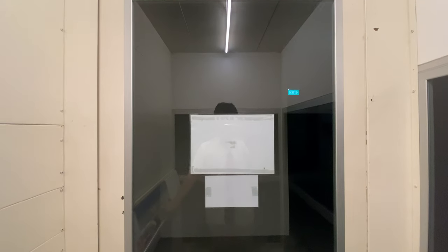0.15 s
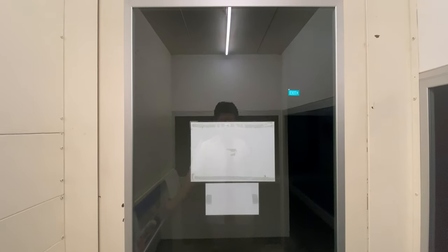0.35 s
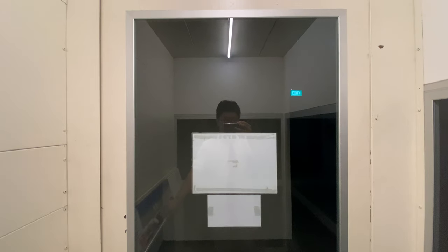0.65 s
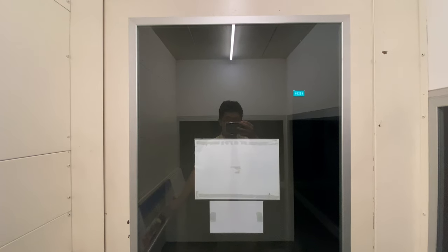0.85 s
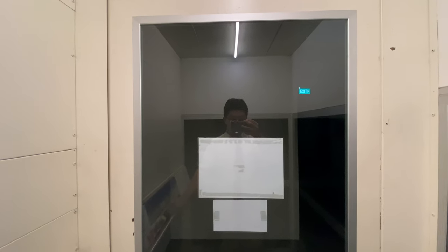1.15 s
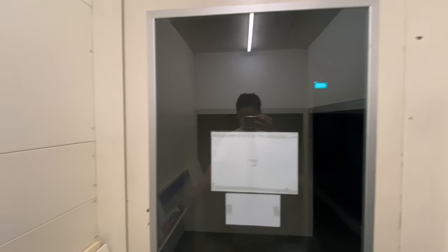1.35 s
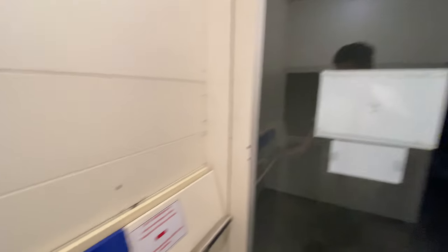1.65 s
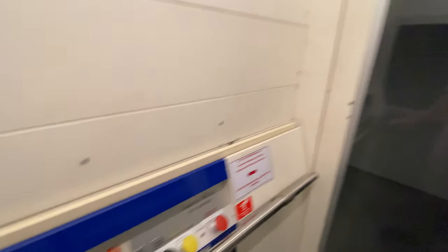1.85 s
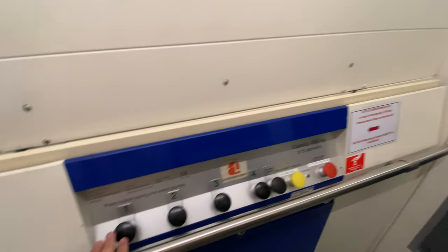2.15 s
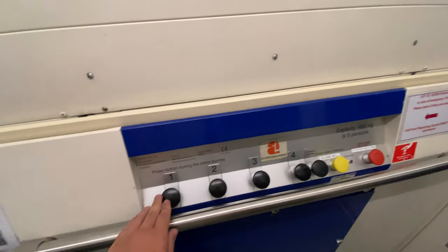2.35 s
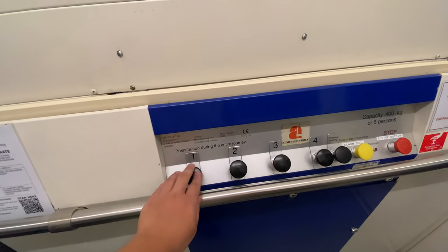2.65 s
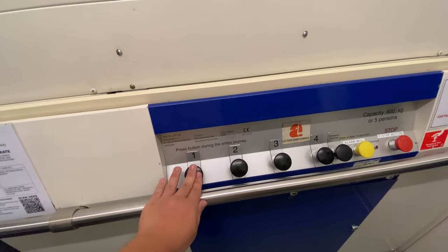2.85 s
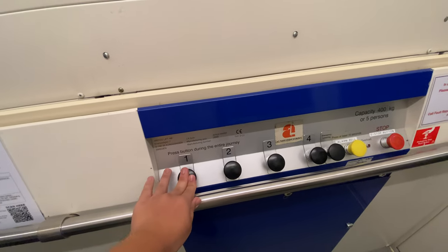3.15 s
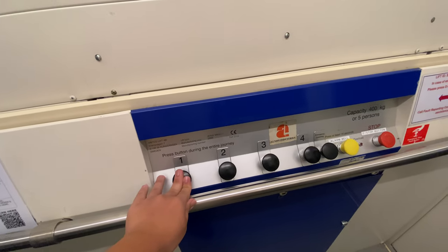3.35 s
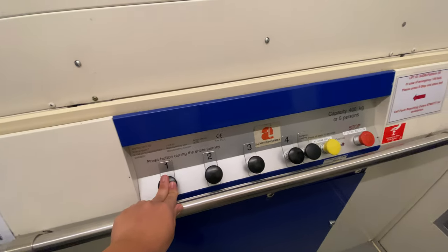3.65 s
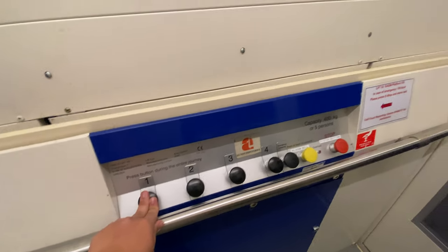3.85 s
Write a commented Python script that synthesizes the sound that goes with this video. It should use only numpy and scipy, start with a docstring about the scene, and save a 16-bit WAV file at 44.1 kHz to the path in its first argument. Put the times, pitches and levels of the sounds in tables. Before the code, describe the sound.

A small platform lift's geared motor whirrs steadily, slows and stops with a metallic clack; someone scuffs and bumps on the platform, mechanism knocks rapidly, then the drive groans back up, heard close inside a reverberant panelled shaft.

```python
"""A geared drive whirrs, clacks and fades as it slows, then hums, groans and whirrs back up: a small platform lift.
In between, the platform thumps and scuffs, a relay or brake part rings briefly and the mechanism knocks.
The drive is gear tones, repeating mesh noise and random grinding that follow one speed curve.
Knocks are rattling noise bursts, struck parts are decaying modes, scuffs and drone are shaped noise.
Drive, knocks and scuffs reverberate in the narrow panelled shaft, over a low drone and still air."""
import sys
import numpy as np
from scipy import signal
from scipy.fft import rfft, irfft, next_fast_len
from scipy.io import wavfile
from scipy.ndimage import uniform_filter1d, map_coordinates

SR = 44100
rng = np.random.default_rng(int(sys.argv[2]) if len(sys.argv) > 2 else 0)


def unload_audio(sound):
    """Save the sound as a 16-bit wav file, at the path given as the first command line argument."""
    columns = np.transpose(np.atleast_2d(sound))
    # keep every value between -1 and 1, then stretch to whole-number steps
    steps = np.round(np.clip(columns, -1, 1) * 32767)
    wavfile.write(sys.argv[1], SR, steps.astype(np.int16))


N = 176400
T = np.arange(N) / SR
TOP_HZ = 15500  # band limit of the microphone

# likeness of left and right: (frequency [Hz], correlation [-1 to 1])
LIKENESS = [(40, 1), (70, 0.99), (125, 0.37), (250, 0.76), (500, 0.31), (1000, 0.12), (2000, -0.21),
            (4000, 0.2), (12000, .12)]


def amp(db):
    """Decibels to gain."""
    return np.exp(np.asarray(db) * (np.log(10) / 20))


def unit(x):
    """Scale to rms 1."""
    return x / np.sqrt(np.mean(x ** 2) + 1e-20)


def along(points, hz):
    """Interpolate (frequency [Hz], value) points on a log frequency axis."""
    f, v = np.transpose(points)
    return np.interp(np.log(hz + 1), np.log(f + 1), v)


def curves(rows):
    """One value per sample for each column after the time."""
    s, *cols = np.transpose(rows)
    return [np.interp(T, s, c) for c in cols]


def wobble(rate):
    """A smooth random curve through rate knots a second."""
    knots = rng.standard_normal(400)
    coarse = T[::100]
    return np.interp(T, coarse, map_coordinates(knots, [coarse * rate], mode="mirror"))


def filtered(x, response):
    """Filter x by a response given as a function of frequency."""
    n = x.shape[-1]
    m = next_fast_len(n + SR // 4, True)
    return irfft(rfft(x, m) * response(np.fft.rfftfreq(m, 1 / SR)), m)[..., :n]


def causal(points, size=2048):
    """Minimum-phase impulse response of a (frequency [Hz], level [dB]) colour, by folding its cepstrum."""
    cepstrum = irfft(np.log(amp(along(points, np.fft.rfftfreq(size, 1 / SR)))))
    cepstrum[1:size // 2] *= 2
    cepstrum[size // 2 + 1:] = 0
    return irfft(np.exp(rfft(cepstrum)))


def boosts(peaks, hz):
    """Summed gain in dB of resonances given as (centre [Hz], width [Hz], boost [dB])."""
    return sum(db / (1 + ((hz - centre) / width) ** 2) for centre, width, db in peaks)


def likeness_angle(hz):
    """Phase angle between left and right that gives their likeness at a frequency."""
    return np.arccos(np.clip(along(LIKENESS, hz), -1, 1))


def side_phases(hz):
    """Opposite phase shifts for left and right, leading on a random side."""
    return likeness_angle(hz) * rng.choice([-1, 1]) * np.array([[.5], [-.5]])


def spread(pair):
    """Mix two unrelated signals as mid and side, so left and right are as alike as the table says."""
    turn = lambda hz: likeness_angle(hz) / 2
    mid, side = filtered(pair, lambda hz: np.array([np.cos(turn(hz)), np.sin(turn(hz))]))
    return np.array([mid + side, mid - side])


def panned(db):
    """Left and right gains for a level difference; positive favours the left."""
    return amp(np.array([[db], [-db]]) / 2)


def rush(colour):
    """Coloured stereo noise of rms 1."""
    noise = rng.standard_normal((2, N))
    return unit(spread(filtered(noise, lambda hz: amp(along(colour, hz)))))


def resonant_noise(modes):
    """Stereo noise through resonances given as (centre [Hz], width [Hz], level [dB])."""
    peaks = lambda hz: sum(amp(db) / (1 + ((hz - centre) / width) ** 4) for centre, width, db in modes)
    return spread(filtered(rng.standard_normal((2, N)), peaks))


def shaft(pair, wet):
    """Add the shaft's reverberation, noise that decays at its own pace in each band, at about equal power."""
    # (frequency [Hz], time to fall 60 dB [s])
    decay_times = [(120, 0.5), (330, 0.91), (700, 0.95), (1500, 0.66), (4000, .62), (7000, 0.58),
                   (14000, 0.2)]
    hz, t, z = signal.stft(rng.standard_normal((2, SR)), SR, nperseg=256)
    decay = amp(-60 * t / along(decay_times, hz)[:, None])
    tail = signal.istft(z * decay, SR, nperseg=256)[1]
    tail /= np.sqrt(np.mean(np.sum(tail ** 2, axis=1)))
    reverb = signal.fftconvolve(pair, tail, axes=1)[:, :pair.shape[1]]
    return (pair + wet * reverb) / np.sqrt(1 + wet ** 2)


def add(out, s, sound):
    """Mix a sound in at a time in seconds."""
    part = out[:, round(s * SR):][:, :sound.shape[1]]
    part += sound[:, :part.shape[1]]


def ringing(modes, blows, attack, blur):
    """Struck modes decay as unsteady sines, shifted in phase between the sides; attack in s, blur in rad."""
    out, t = np.zeros((2, N)), np.arange(SR) / SR
    beat_db = 5.5
    for s, db in blows:
        for hz, mode_db, t60 in modes:
            phase = 2 * np.pi * hz * t + side_phases(hz) + blur * wobble(65)[:SR]
            level_db = db + mode_db - 60 * t / t60 + beat_db * wobble(46)[:SR]
            add(out, s, amp(level_db) * (1 - np.exp(-t / attack)) * np.sin(phase))
    return out


def still_air():
    """Faint steady noise, strongest in the bass."""
    # (frequency [Hz], relative level [dB])
    air_colour = [(20, 1.5), (60, 0.5), (110, 0.5), (250, -5.5), (480, -10), (700, -17.5), (1200, -25.5),
                  (2200, -30), (6500, -40), (9000, -47.5), (15000, -67)]
    return amp(-53) * rush(air_colour)


def drone():
    """Noise in the shaft's low resonances, evened out and then swelling along a level curve."""
    # (time [s], level before the trim [dB])
    swells = [(0, -39), (.85, -36), (.95, -44), (1.15, -43), (1.33, -38), (1.52, -44.5), (1.7, -36),
              (2.0, -42), (2.2, -42), (2.65, -47), (3.0, -41.5), (3.15, -48.5), (3.45, -39.5), (3.75, -38),
              (4, -39)]
    # (centre [Hz], width [Hz], relative level [dB])
    low_modes = [(47.5, 15.7, 1), (70.4, 14.4, 1), (155, 9.5, -11)]
    trim_db = 0.5
    level_db, = curves(swells)
    rumble = resonant_noise(low_modes)
    power = uniform_filter1d(np.mean(rumble ** 2, axis=0), size=8000)
    return amp(level_db + trim_db) * rumble / np.sqrt(np.abs(power) + 1e-12)


def wall():
    """A bump sets the modes of a wall sheet ringing."""
    # (frequency [Hz], relative level [dB], time to fall 60 dB [s])
    sheet_modes = [(300, -6, 0.98), (912, -0.5, 0.54), (1262, -3, .5), (1340, -2, 0.46)]
    # (time [s], level [dB])
    bumps = [(1.397, -38)]
    return ringing(sheet_modes, bumps, attack=0.011, blur=0.65)


def floor():
    """Jolts thump the low modes of the platform floor."""
    # (frequency [Hz], relative level [dB], time to fall 60 dB [s])
    floor_modes = [(84, 0, 0.11), (114.2, 2, 0.28), (146.3, 0, 0.23), (186.5, -8, 0.21)]
    # (time [s], level [dB])
    jolts = [(1.716, -38.5), (3.212, -20), (3.258, -26), (3.403, -45)]
    return panned(2.5) * ringing(floor_modes, jolts, attack=0.014, blur=0.44)


def deck():
    """Steps strike the modes of the platform deck."""
    # (frequency [Hz], relative level [dB], time to fall 60 dB [s])
    deck_modes = [(236.5, -2, 0.21), (410, -0.5, 0.27), (1766, -15, .31)]
    # (time [s], level [dB])
    steps = [(1.72, -29.5), (1.762, -33)]
    return ringing(deck_modes, steps, attack=0.0058, blur=0.5)


def scuff():
    """Uneven rubbing noise as someone turns on the platform."""
    # (time [s], level [dB])
    strokes = [(1.45, -72), (1.56, -48.5), (1.68, -36), (1.8, -37), (1.93, -35), (2.03, -50.5), (2.13, -95),
               (2.3, -52.5), (2.45, -100)]
    # (frequency [Hz], relative level [dB])
    rub_colour = [(70, -1.5), (170, -1.5), (500, -7), (1000, -2), (1400, -13), (2100, -10.5), (3500, -22.5),
                  (7000, -30), (11000, -36.5), (14000, -39)]
    level_db, = curves(strokes)
    return shaft(rush(rub_colour) * amp(level_db + 3.05 * wobble(45.2)), wet=0.86)


def relay():
    """A relay or brake part knocks and rings briefly near 550 Hz, with a few weaker modes."""
    # (frequency [Hz], relative level [dB], time to fall 60 dB [s])
    relay_modes = [(552, -0.5, 0.36), (471, -4, 0.25), (1185, -17, 0.18), (1483, -15, .2)]
    # (time [s], level [dB])
    knock = [(3.093, -28)]
    return panned(6.4) * ringing(relay_modes, knock, attack=0.0053, blur=0.35)


def knocks():
    """Each knock is a quick rattle of contacts that sets the wall panels and the shaft ringing."""
    # (time [s], rise [s], rattle's time to fall 60 dB [s], then relative level in each of five bands [dB])
    hits = [(.906, 0.0088, 0.22, -47, -36.5, -32.5, -32.5, -37.5),
            (1.333, 0.011, 0.62, -67, -49, -53.5, -54.5, -55),
            (1.392, 0.0079, 0.19, -55, -38, -35.5, -44, -52),
            (1.568, 0.0073, 0.73, -39, -64, -37.5, -47.5, -49),
            (1.708, 0.015, 0.3, -37, -36.5, -31, -38.5, -39),
            (1.88, 0.033, 0.33, -41, -64, -49, -48.5, -49.5),
            (2.965, 0.008, 0.48, -58, -48.5, -48.5, -50, -56.5),
            (3.02, 0.024, 0.65, -46, -39, -60, -50, -55), (3.088, 0.0049, 0.58, -43, -40.5, -37, -54, -59),
            (3.14, 0.026, 0.93, -59, -63, -35.5, -44, -50.5),
            (3.196, 0.018, 0.19, -48, -33, -26.5, -37.5, -39),
            (3.29, .006, 0.27, -33, -38.5, -36, -52, -61.5), (3.359, 0.02, 0.17, -61, -60, -38, -43, -43.5),
            (3.382, 0.019, .21, -31, -34, -29, -33, -40),
            (3.416, 0.0046, .092, -27, -31, -34.5, -37, -39.5), (3.457, .008, 0.2, -56, -41, -32, -39, -39),
            (3.481, 0.0062, 0.15, -38, -33.5, -24, -36.5, -36)]
    # (centre of each band [Hz])
    band_hz = [140, 450, 1400, 3500, 7000]
    # wall panel resonances: (centre [Hz], width [Hz], boost [dB])
    wall_peaks = [(925, 15, 1.8), (1247, 21, 4.9), (1576, 30, 5.7), (1900, 42, 3.4), (2280, 130, 5.3),
                  (2866, 60, 4), (4130, 12, 3.6), (5600, 42, 4.4), (5960, 216, 6.7), (6560, 68, 3.8),
                  (8000, 360, 2.3)]
    grit_depth, treble_hz, treble_loss_db = 0.28, 12400, 12
    out, t = np.zeros((2, N)), np.arange(SR // 2) / SR
    for s, rise, decay, *band_db in hits:
        # a random strength for every 30 samples makes the rattle gritty
        grit = np.exp(grit_depth * np.repeat(rng.standard_normal(len(t) // 30), 30))
        envelope = np.minimum(t / max(rise, 1e-4), 1) * amp(-60 * np.maximum(t - rise, 0) / decay)
        contacts = unit(rng.standard_normal((2, len(t))) * grit * envelope) * np.sqrt(.08)
        # scale each band against the full bandwidth, then slope off at both ends
        bands = [(hz, db + 10 * np.log10(SR / 2 / hz)) for hz, db in zip(band_hz, band_db)]
        bass = (40, bands[0][1] - 15)
        treble_db = bands[-1][1] - treble_loss_db
        colour = [bass] + bands + [(treble_hz, treble_db), (TOP_HZ, treble_db - 4)]
        add(out, s, signal.fftconvolve(contacts, causal(colour)[None], axes=1))
    panelled = filtered(shaft(out, wet=0.79), lambda hz: amp(boosts(wall_peaks, hz) - 1.36))
    return panned(1.4) * spread(panelled)


def brake():
    """The brake clacks, ringing its steel modes almost at once."""
    # (frequency [Hz], relative level [dB], time to fall 60 dB [s])
    steel_modes = [(1500, -3.5, 0.52), (1700, -6, 0.4), (1850, -0.5, 0.22), (2145, -2.5, 0.18),
                   (2060, -11, .3), (4059, -14, 0.235), (6480, -24, 0.29), (6160, -14, 0.13),
                   (6500, -12, 0.33)]
    # (time [s], level [dB])
    clacks = [(0.916, -27), (3.488, -27)]
    return ringing(steel_modes, clacks, attack=0.0008, blur=1.0)


def groan():
    """The frame resonates as the drive picks up speed."""
    # (time [s], level [dB])
    swell = [(3.6, -110), (3.72, -40), (3.88, -37), (3.93, -22.5), (4, -36)]
    # (centre [Hz], width [Hz], relative level [dB])
    frame_modes = [(407.6, 43.5, 0.5), (544, 96, -5)]
    level_db, = curves(swell)
    return amp(level_db) * unit(resonant_noise(frame_modes))


def starting_hum():
    """The motor hums unsteadily and rumbles while it takes up the load."""
    # (time [s], relative level [dB])
    effort = [(3.2, -88), (3.27, -46), (3.62, -40.5), (3.75, -30), (3.82, -29.5), (3.93, -40), (4, -45)]
    # hum partials: (frequency [Hz], relative level [dB])
    partials = [(147, -1), (294, -20.5), (385, -7.5)]
    # (frequency [Hz], relative level [dB])
    rumble_colour = [(40, -28.5), (100, 0.5), (200, 3.5), (350, -6), (520, -2), (1000, -20.5), (2200, -32),
                     (6000, -31), (14000, -46)]
    level_db, = curves(effort)
    hum = 0
    for hz, db in partials:
        phase = 2 * np.pi * hz * T + 0.26 * wobble(16)
        hum = hum + amp(db + 2.3 * wobble(60)) * np.sin(phase)
    rumble = amp(-2.5) * rush(rumble_colour)
    return panned(3.2) * amp(level_db) * (np.sqrt(2) * hum + rumble)


def gear_tones(turned, speed):
    """Tones follow the drive's rotation; each wavers on its own, and the high ones fade first as it slows."""
    # (frequency at full speed [Hz], relative level [dB])
    strong_tones = [(296.1, -39.5), (317.6, -46), (339.1, -42.5), (382.2, -43), (511.4, -36.5),
                    (532.9, -43.5), (592.2, -44.5), (683.7, -36.5), (786.0, -45), (807.5, -44),
                    (829.0, -34), (872.1, -41), (1023, -38), (1217, -34), (1292, -49), (1340, -39),
                    (1362, -31), (1556, -38.5), (1750, -47), (2067, -42), (2363, -39), (2530, -42)]
    fade_depth_db, full_fade_hz = 56, 1000  # lower tones hold on longer
    waver_db, drift, rough = 3.5, 0.57, 0.37  # slow level, slow phase [rad], quick shake of both
    tones = np.zeros((2, N))
    for hz, db in strong_tones:
        apart = side_phases(hz)
        phase = 2 * np.pi * (hz * turned + rng.random()) + drift * wobble(10) + rough * wobble(55)
        fade_db = fade_depth_db * (1 - speed) * min(hz / full_fade_hz, 1) ** 2
        level = amp(db - fade_db + waver_db * np.tanh(wobble(6))) * (1 + rough * wobble(55))
        tones += level * np.sin((phase + apart).astype(np.float32))
    return np.sqrt(2) * tones


def drive():
    """Gear tones, a rough mesh that repeats every turn and random grinding; all duller when slow."""
    # (time [s], share of full speed, relative level [dB])
    run = [(0, 1, 1), (.65, 1, 0), (.79, .82, 1.5), (.9, 0.58, 2), (1.0, .35, -1.5), (1.07, .25, -34),
           (1.2, .1, -52.5), (3.4, 0.099, -62), (3.52, .25, -1.5), (3.7, .35, -15.5), (3.82, 0.76, 2),
           (3.91, 0.98, 3), (4, 1, -1)]
    # (frequency [Hz], relative level [dB])
    housing_colour = [(70, -21), (105, -1), (150, -27), (200, -9.5), (280, 0), (420, -1), (600, -1),
                      (850, -3), (1100, -6), (1350, -4.5), (1900, -6.5), (2400, -3.5), (3200, -10),
                      (4400, -20), (5800, -16), (7200, -25), (10500, -32.5), (14500, -49)]
    # (centre [Hz], width [Hz], boost [dB])
    housing_peaks = [(342, 33, 5.5), (570, 22, 6.5), (874, 43, 3.5), (1016, 35, 6), (1249, 41, 7.5),
                     (1358, 13, 2.5), (1758, 46, 10.5), (2053, 69, 3.5), (2110, 55, 4.5)]
    turns_hz, speed_waver = 21.27, 0.001218  # turns a second at full speed, share of speed
    tones_db, mesh_db, grind_db, flutter_db = -1.5, -27.5, -29, 0.7
    dull_hz, dull_db = 1205, 40.5  # above this the noise loses up to this much as speed drops
    speed, level_db = curves(run)
    turned = np.cumsum(speed * (1 + speed_waver * wobble(6.04))) / SR  # seconds' worth of full speed

    # one turn of random tooth roughness, read round and round
    teeth = rng.standard_normal((2, int(SR / turns_hz)))
    mesh = np.array([map_coordinates(side, [turned * turns_hz % 1 * len(side)], mode="grid-wrap")
                     for side in teeth])
    grinding = amp(grind_db) * rng.standard_normal((2, N)) + amp(mesh_db) * mesh * np.sqrt(np.abs(speed))
    body = filtered(grinding, lambda hz: unit(amp(along(housing_colour, hz) + boosts(housing_peaks, hz))))
    low = filtered(body, lambda hz: 1 / (1 + (hz / dull_hz) ** 4))
    body = low + (body - low) * amp(-dull_db * (1 - speed))
    body = body * amp(level_db + flutter_db * wobble(60))

    tones = gear_tones(turned, speed) * amp(tones_db + level_db)
    tones = filtered(tones, lambda hz: 1 / (1 + (230 / (hz + 1)) ** 8))  # trims the bass
    return panned(1.5) * (spread(shaft(body, wet=0.5)) + shaft(tones, wet=0.49))


def scene():
    """Background, platform, mechanism and drive together."""
    background = still_air() + drone()
    platform = wall() + floor() + deck() + scuff()
    mechanism = relay() + knocks() + brake() + groan() + starting_hum()
    return background + platform + mechanism + drive()


def record(dry):
    """The microphone passes almost nothing above its band limit."""
    return filtered(dry, lambda hz: 1 / (1 + (hz / TOP_HZ) ** 80))


dry = scene()
out = record(dry)
unload_audio(out)
```